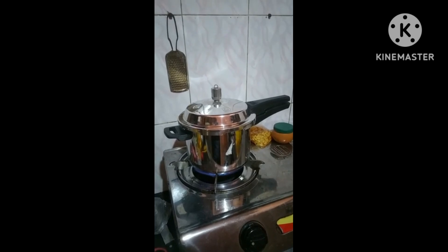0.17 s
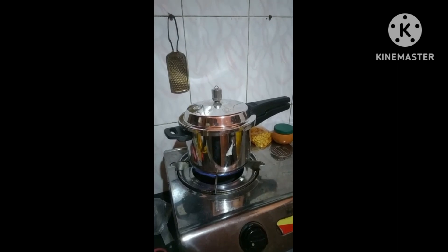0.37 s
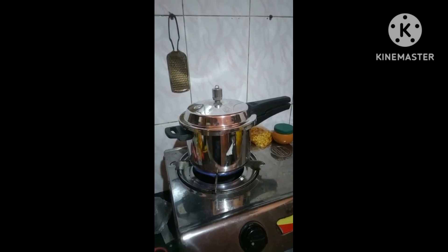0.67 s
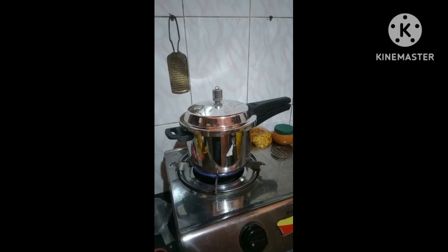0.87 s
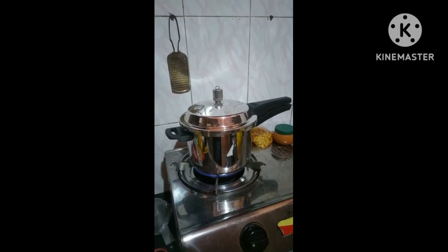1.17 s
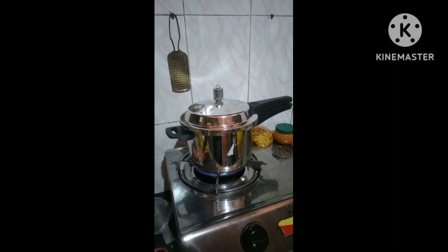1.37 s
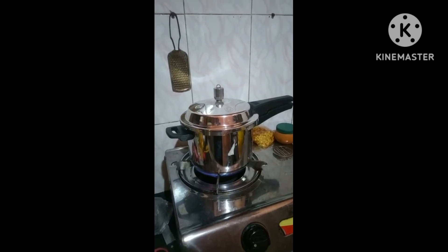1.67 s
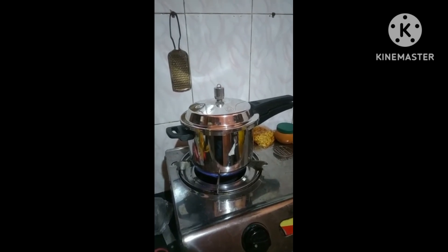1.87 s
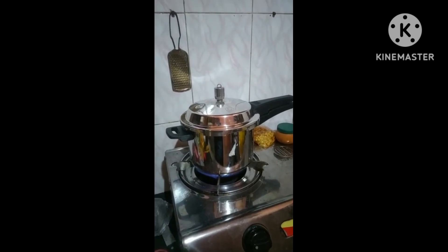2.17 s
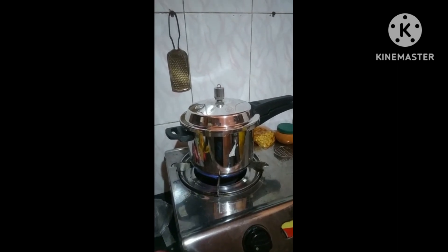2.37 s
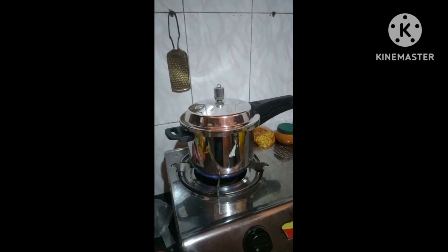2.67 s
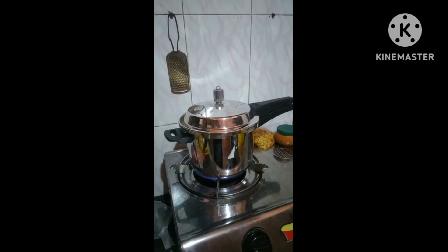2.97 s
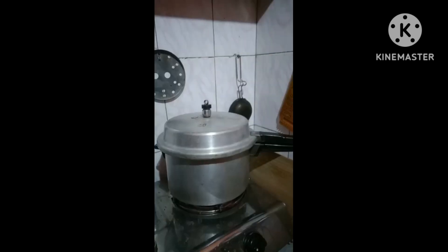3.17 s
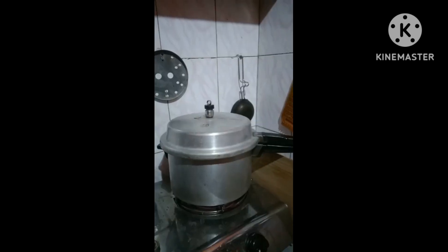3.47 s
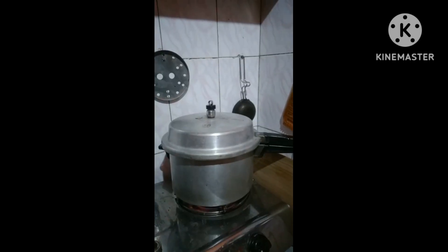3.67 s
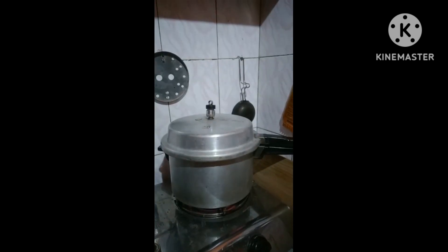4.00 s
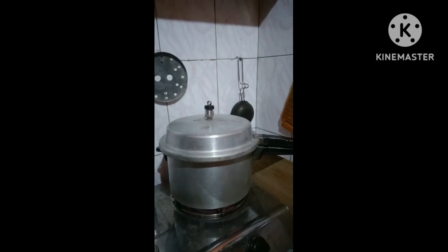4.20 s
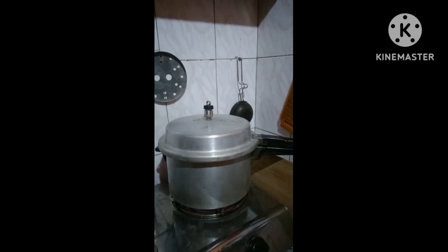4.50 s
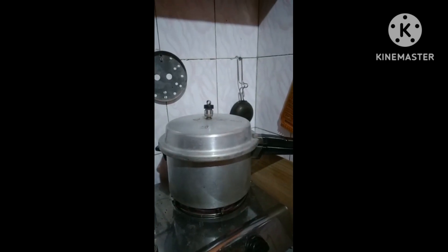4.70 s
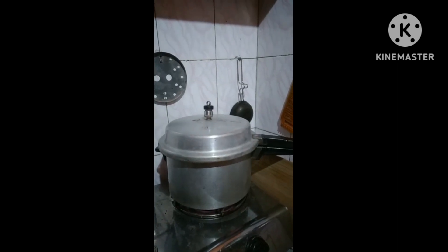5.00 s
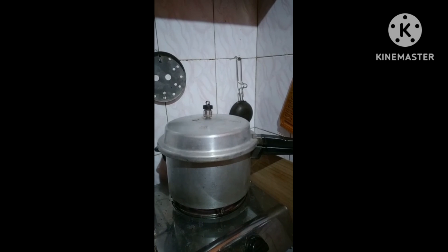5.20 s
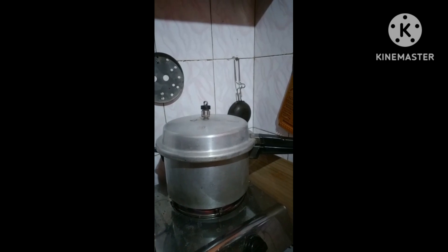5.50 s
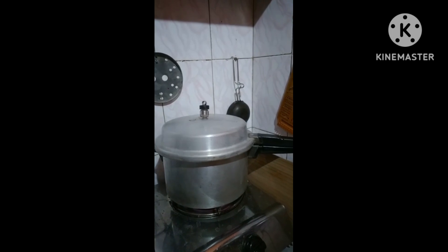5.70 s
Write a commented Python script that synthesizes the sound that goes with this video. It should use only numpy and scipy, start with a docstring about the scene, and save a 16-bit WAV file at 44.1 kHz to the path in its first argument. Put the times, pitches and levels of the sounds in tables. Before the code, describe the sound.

Two pressure cookers hiss in turn, the second letting out a loud one-second blast of steam before blowing more softly.

```python
"""Two pressure cookers hiss on a gas stove, one after the other, close to two microphones. The small one leaks
steadily as the first scene fades out. The second scene fades in on the big one, which lifts the weight on its
vent for a one-second blast, then keeps blowing softly. The hollow in front of each microphone colours the hiss.
The strong hiss overloads each microphone, adding a lumpy roar and rumble, different left and right."""
import sys
import numpy as np
from scipy import signal
from scipy.fft import rfft, irfft, next_fast_len
from scipy.io import wavfile
from scipy.ndimage import uniform_filter1d, map_coordinates

SR = 44100
rng = np.random.default_rng(int(sys.argv[2]) if len(sys.argv) > 2 else 0)


def dump(signal):
    """Clip the signal to [-1, 1] and save it as 16-bit WAV at the path in sys.argv[1]."""
    limited = np.clip(np.atleast_2d(signal).T, -1, 1)
    pcm = np.round(limited * 32767).astype(np.int16)
    wavfile.write(sys.argv[1], SR, pcm)


N = 257984
TIME_S = np.arange(N) / SR

def amp(db):
    """Turn decibels into a gain."""
    return 10 ** (np.asarray(db) / 20)

def unit(x):
    """Scale each channel to an average power of 1."""
    return x / np.sqrt(np.mean(x ** 2, axis=-1, keepdims=True) + 1e-20)

def filtered(x, response):
    """Turn each frequency up or down by the gain response(hz)."""
    size = next_fast_len(N + 8192)
    return irfft(rfft(x, size) * response(np.fft.rfftfreq(size, 1 / SR)), size)[..., :N]

def ramp(start_s, end_s):
    """Go from 0 to 1 between two times."""
    return np.clip((TIME_S - start_s) / (end_s - start_s), 0, 1)

def swells(rows):
    """Rise and fall around each row's time; one curve per column of heights."""
    return sum(np.outer(heights, ramp(s - half, s) - ramp(s, s + half)) for s, half, *heights in rows)

def wobble(rate_hz):
    """A smooth random curve for each side."""
    points = rng.standard_normal((2, int(N * rate_hz / SR) + 4))
    return np.array([map_coordinates(side, [TIME_S * rate_hz]) for side in points])

def rush(colour, patchy_db):
    """Separate rushing noise on each side, with random louder and softer patches."""
    bands = signal.stft(rng.standard_normal((2, N)), nperseg=512)[2]
    patches = uniform_filter1d(rng.standard_normal(bands.shape), 5, axis=1)
    patches = uniform_filter1d(patches, 8, axis=2)
    noise = signal.istft(bands * amp(patchy_db * patches / patches.std()), nperseg=512)[1][:, :N]
    pitch_hz, *sides_db = np.transpose(colour)
    gain = lambda hz: amp([np.interp(np.log(hz + 1), np.log(pitch_hz), db, -120, -120) for db in sides_db])
    return unit(filtered(noise, gain))

def overload_roar(roar, rumble, roar_colour, rumble_colour, fast_db, slow_db, patchy_db):
    """A lumpy, spiky roar and rumble from the hiss overloading each microphone."""
    lumps = amp(np.c_[fast_db] * wobble(520) + np.c_[slow_db] * wobble(60))
    roaring = roar * unit(lumps * rush(roar_colour, patchy_db))
    return roaring + rumble * unit(lumps * rush(rumble_colour, patchy_db=1.0))

# Gusts and lulls of steam on the right: time_s, half_length_s, roar_db, rumble_db
STEAM_GUSTS = [(.07, 0.097, 8.5, 14), (.18, .05, -4.5, -4), (.34, 0.12, 6.5, 3), (.67, .09, 2, 1.5),
               (.87, 0.056, 3.5, -1), (1.07, 0.11, 3, -1), (1.28, 0.086, 7.5, 6), (1.41, 0.11, 6, 6),
               (1.65, 0.12, 4.5, 6), (1.85, 0.22, 5, 8), (2.25, .15, 3, 14), (2.55, 0.21, 2.5, 2),
               (2.75, 0.059, 3.5, 0), (2.93, 0.13, 5, 8), (5.01, 0.014, 2, 2), (5.17, 0.076, 5.5, -2),
               (5.36, 0.12, 3, 2.5), (5.56, 0.11, 1.5, 1), (5.76, 0.076, 1, 1)]
# The hiss briefly swells or sags: time_s, half_length_s, left_db, right_db
HISS_BUMPS = [(2.97, .05, 3.5, -0.5), (3.95, 0.033, 1, 3.5), (4.03, 0.11, -4, -3), (4.95, 0.05, 0.5, 3)]

def gusty_gains(levels_db):
    """Gains of roar, rumble and hiss: steam brushes the right microphone, and all three drift."""
    roar_db, rumble_db = swells(STEAM_GUSTS)
    bumps_db = [np.outer([0, 1], roar_db), np.outer([0, 1], rumble_db), swells(HISS_BUMPS)]
    drift_db = [depth_db * wobble(7) for depth_db in (.5, 1.4, .25)]
    return amp(levels_db + np.array(bumps_db) + drift_db)

# Faint tones of the small vent: pitch_hz, width_hz, level_db, swell_time_s, swell_db
VENT_TONES = [(5750, 45, -51.5, 2.2, 1), (5900, 60, -52.5, 1.0, 5)]

def vent_whistle():
    """Two fuzzy tones, each a narrow band of noise that swells once."""
    noises = amp(1.7 * wobble(3.4)) * rng.standard_normal((2, N))
    whistle = np.zeros(N)
    for noise, (pitch_hz, width_hz, level_db, time_s, swell_db) in zip(noises, VENT_TONES):
        tone = unit(filtered(noise, lambda hz: np.exp(-((hz - pitch_hz) / width_hz) ** 2)))
        whistle += amp(level_db + swells([(time_s, .5, swell_db)])[0]) * tone
    return whistle

def hum(pitch_hz=295, level_db=-57):
    """A faint tone whose loudness wavers."""
    return amp(level_db + 2.8 * wobble(4.44)[0]) * np.sin(2 * np.pi * pitch_hz * TIME_S)

# Colours (how strong each pitch is next to the others): pitch_hz, left_db, right_db
SMALL_ROAR_COLOUR = [(120, -26, -19), (194, -5, -1), (600, -4.5, -0.5), (1310, -1, 1.5), (1910, -1.5, -1),
                     (2500, -3, -6), (3060, -7, -12), (4500, -37, -17.5)]
SMALL_RUMBLE_COLOUR = [(8, -9, -8), (40, -5, -6), (90, -2, 1.5), (160, -5, -2), (238, -17, -25)]
SMALL_HISS_COLOUR = [(2000, -24, -8), (3300, -12.5, -17), (4600, -5.5, -13), (5300, -3.5, -11.5),
                     (5850, -2, -16), (6400, -2, -13), (7200, -3.5, -13), (8000, -8, -11), (9200, -9, -7.5),
                     (10160, -12, -1.5), (11200, -10, -5), (12300, -12.5, -9.5), (14400, -9, -13),
                     (16000, -12, -13)]
# Base loudness, one row each for roar, rumble and hiss: left_db, right_db
SMALL_LEVELS = [(-40.5, -38), (-55.5, -51.5), (-38.5, -38)]

def small_cooker():
    """A thin, steady leak with its whistle and a hum on the left, as the scene fades out."""
    fade = (1 - ramp(3.003, 3.153)) ** 1.16 * (TIME_S < 3.14)
    roar, rumble, hiss = fade * gusty_gains(np.array(SMALL_LEVELS)[..., None])
    tones = np.outer([1, 0], fade * (vent_whistle() + hum()))
    jet = hiss * unit(amp(0.37 * wobble(40)) * rush(SMALL_HISS_COLOUR, patchy_db=1.55))
    overload = overload_roar(roar, rumble, SMALL_ROAR_COLOUR, SMALL_RUMBLE_COLOUR,
                             fast_db=[1.5, 2.4], slow_db=[.4, .5], patchy_db=0.4)
    return overload + jet + tones

BIG_START_S = 3.48
# Base loudness before, during and after the blast; rows are roar, rumble, hiss: left_db, right_db
LEAK_LEVELS = [(-30, -31.5), (-40.5, -41), (-33, -30)]
BLAST_LEVELS = [(-10.5, -9), (-21, -14.5), (-20, -21)]
AFTER_LEVELS = [(-25, -22), (-37, -27.5), (-35.5, -35.5)]
# How the same three follow the weight: rise_start_s, rise_end_s, fall_start_s, fall_end_s
WEIGHT_TIMES = [(3.925, 3.951, 4.9, 5.02), (3.93, 3.97, 4.95, 5.03), (3.91, 3.95, 4.955, 5.03)]

def weight_valve():
    """The big cooker's gains: the scene fades in on a leak, the weight lifts for the blast, then drops back."""
    leak, blast, after = np.array([LEAK_LEVELS, BLAST_LEVELS, AFTER_LEVELS])[..., None]
    rise = np.array([ramp(*row[:2]) for row in WEIGHT_TIMES])[:, None]
    fall = np.array([ramp(*row[2:]) for row in WEIGHT_TIMES])[:, None]
    fade = ramp(3.476, 3.753) ** np.c_[[0.86, 0.53, 1.11]] * (TIME_S >= BIG_START_S)
    return fade[:, None] * gusty_gains(leak + rise * (blast - leak) + fall * (after - blast))

# Colours of the big cooker's roar, rumble and three hisses: pitch_hz, left_db, right_db
BIG_ROAR_COLOUR = [(118, -19, -15.5), (198, -2, 1), (604, -1, -3), (1330, -0.5, -3), (1930, -2.5, -6.5),
                   (2460, -5.5, -11.5), (3080, -13, -20), (4530, -23, -26)]
BIG_RUMBLE_COLOUR = [(7.9, -8, 1), (29.8, -7, -4), (90, -0.5, 1.5), (161.5, -5, -1), (241, -17, -30)]
LEAK_COLOUR = [(2010, -25, -6), (3320, -10, -13), (5000, -1, -12.5), (7200, 1, -11), (8000, -1, -5),
               (9000, -5, -3.5), (10200, -9, 0.5), (11500, -12, -6.5), (13000, -16, -11), (16000, -19, -19)]
BLAST_COLOUR = [(1998, -17, -5), (3280, -3, -2), (5300, 2, -0.5), (7000, 0, -2.5), (8500, -2, -2.5),
                (10300, -4.5, 2), (12000, -5.5, -2), (15900, -8, -7)]
AFTER_COLOUR = [(2000, -20, -28), (3330, -4, -5), (5250, 2, -1.5), (7460, -1, -5.5), (9000, -4, -2),
                (10400, -7, 1), (12000, -7, -3.5), (16000, -8, -8)]

def big_cooker(roar, rumble, hiss, lift_s=3.94, narrow_s=4.92, drop_s=5.01):
    """The steam's hiss changes colour as the weight lifts, narrows the vent and settles."""
    opened = ramp(lift_s, lift_s + 0.018) * (1 - 0.84 * ramp(narrow_s, narrow_s + .04))
    settled = ramp(drop_s, drop_s + .04)
    shares = np.sqrt([(1 - opened) * (1 - settled), opened * (1 - settled), settled])
    colours = (LEAK_COLOUR, BLAST_COLOUR, AFTER_COLOUR)
    blend = sum(share * rush(colour, patchy_db=1.36) for share, colour in zip(shares, colours))
    jet = hiss * amp(0.55 * wobble(30)) * blend
    return jet + overload_roar(roar, rumble, BIG_ROAR_COLOUR, BIG_RUMBLE_COLOUR,
                               fast_db=[.7, 2.2], slow_db=[.4, 1.4], patchy_db=0.9)

# Tones under the big cooker's leak: pitch_hz, level_db, loudest_s, half_length_s
LEAK_NOTES = [(100, -44, 3.5, .14), (540, -43, 3.75, .12), (772, -39.5, 3.77, .24)]

def leak_tones():
    """Three faint, pure tones swell and die away."""
    tones = sum(swells([(loudest_s, half_s, amp(db))])[0] * np.sin(2 * np.pi * hz * TIME_S)
                for hz, db, loudest_s, half_s in LEAK_NOTES)
    return tones * (TIME_S >= BIG_START_S)

# Low thumps as the signal shifts off centre: start_s, rise_s, left_peak, right_peak
THUMPS = [(3.48, 0.054, 0.025, 0.02), (3.955, 0.053, -0.21, -.2), (4.979, 0.0029, -0.58, -0.029)]

def overload_thumps(roar):
    """Each overloaded microphone's signal shifts off centre, and wanders more as the roar grows."""
    sway = 1.23 * roar ** 2 * wobble(36)
    for start_s, rise_s, left, right in THUMPS:
        age = np.clip(TIME_S - start_s, 0, None) / rise_s
        sway += np.outer([left, right], age * np.exp(1 - age))
    return sway

def scene():
    """The small cooker, then the big one."""
    roar, rumble, hiss = weight_valve()
    return small_cooker() + big_cooker(roar, rumble, hiss) + leak_tones() + overload_thumps(roar)

def record(dry, top_hz=15600):
    """The microphone input rounds off and clips the blast's peaks and cuts the highest treble."""
    rounded = dry / (1 + np.abs(dry / 1.02) ** 5) ** (1 / 5)
    treble_cut = lambda hz: np.sin(np.pi / 2 * np.clip((top_hz + 150 - hz) / 300, 0, 1)) ** 2
    return np.clip(filtered(rounded, treble_cut), -1, 1)

dry = scene()
out = record(dry)
dump(out)
```